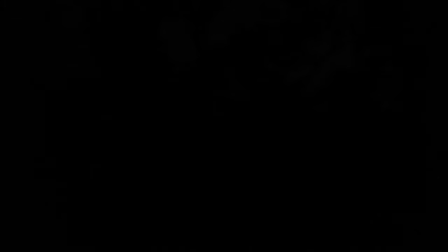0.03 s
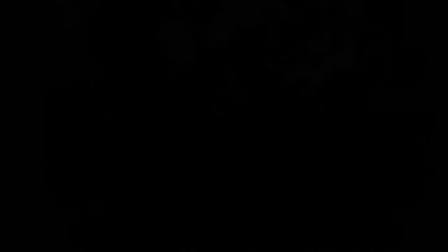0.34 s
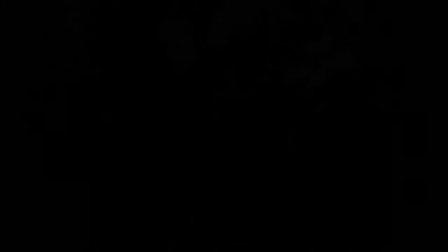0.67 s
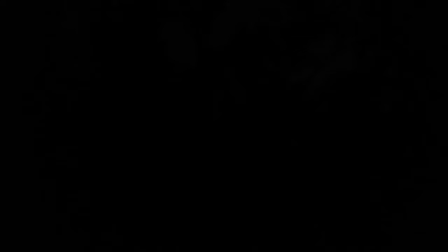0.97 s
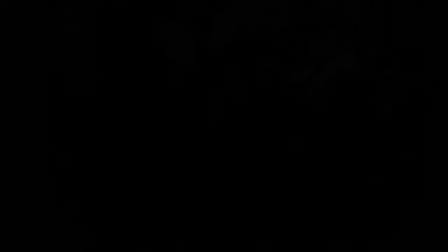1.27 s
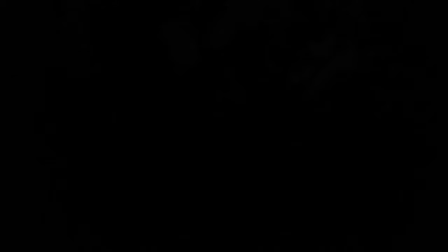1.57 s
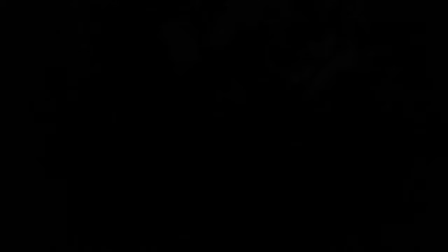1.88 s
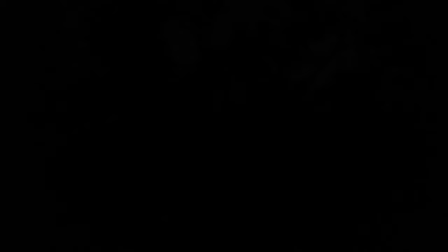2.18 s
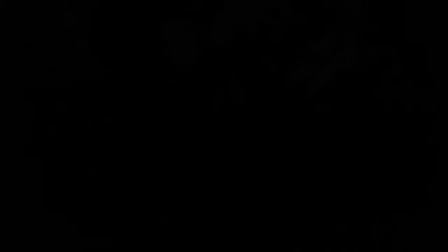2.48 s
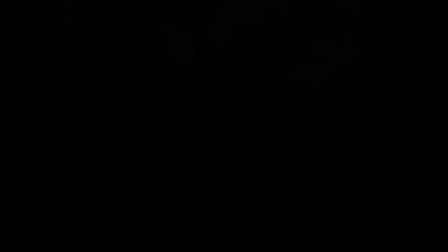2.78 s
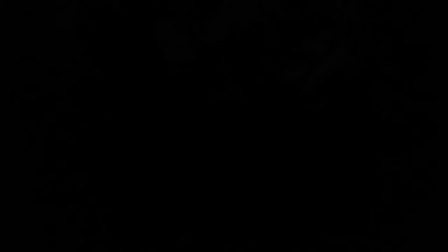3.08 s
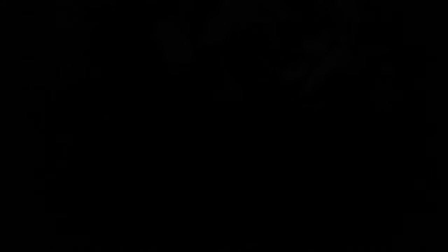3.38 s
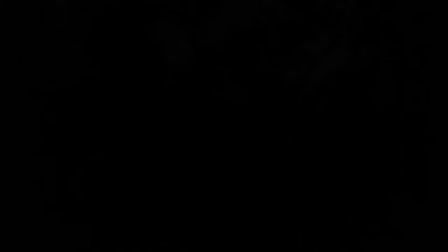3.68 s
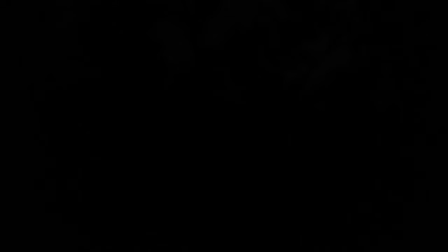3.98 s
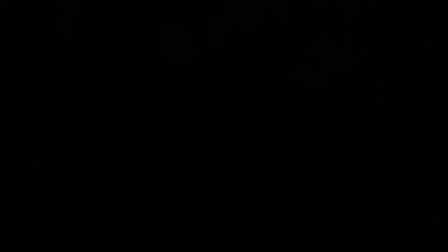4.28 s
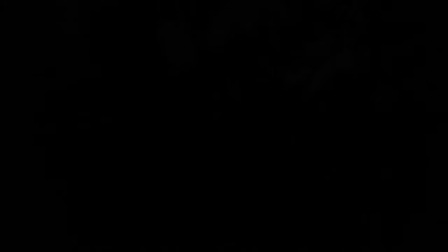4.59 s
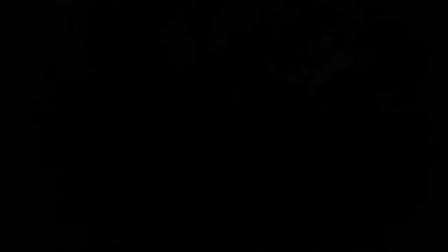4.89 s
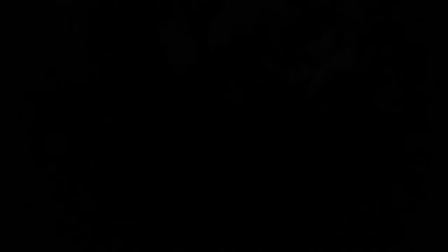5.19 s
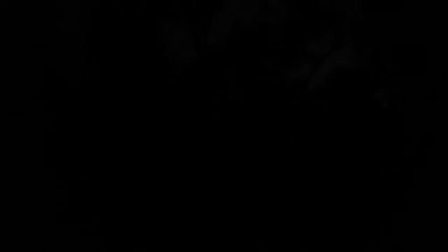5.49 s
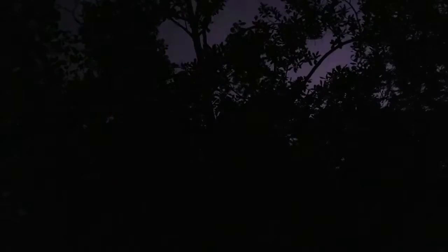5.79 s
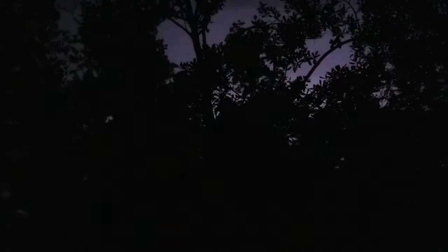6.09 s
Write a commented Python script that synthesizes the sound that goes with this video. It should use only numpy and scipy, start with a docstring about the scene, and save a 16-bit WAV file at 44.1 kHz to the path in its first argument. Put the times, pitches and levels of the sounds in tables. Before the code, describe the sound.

A quiet wooded garden at night, with a soft low rumble, a very faint hum and a thin shimmer of insects throughout. At about 0.3 seconds a distant toad starts a rapid, high trill that grows gradually, then sinks and stops at about 2.7 seconds. At about 1.3 seconds a closer toad joins on nearly the same pitch, slightly to the left. Its trill starts hurried, swells over the next second or so and becomes the loudest sound, an even, ringing purr of very fast pulses. It holds alone, slowing only a little, and stops at about 6.1 seconds. The trees add a light, short echo to both calls. A few faint insect buzzes come in the first 1.5 seconds, and leaves stir and tick very softly now and then behind the toads.

```python
"""A wooded garden at night. Two toads trill: a far one starts, a near one joins and holds its trill.
Each note is two puffs of air that set the vocal sac ringing; ground, trunks and leaves scatter it.
Each call starts hurried, swells as the sac fills and slows as the toad tires.
Behind them are thin bands of insects, a low rumble with a faint hum, and leaves that stir and tick."""
import sys
import numpy as np
from scipy import signal
from scipy.fft import rfft, irfft
from scipy.io import wavfile

SR = 44100
rng = np.random.default_rng(int(sys.argv[2]) if len(sys.argv) > 2 else 0)


def store_wav(level_fs):
    """Save 16-bit WAV to argv[1]."""
    pcm = np.round(np.clip(np.atleast_2d(level_fs), -1, 1) * 32767)
    wavfile.write(sys.argv[1], SR, pcm.T.astype(np.int16))


N = 270774
TIME = np.arange(N) / SR

# Night air and hiss. Each row: frequency in Hz, relative spectral level in dB.
AIR_SPECTRUM = [(25, -13), (45, -2.5), (80, 1), (115, -1), (170, -9), (300, -15.5), (600, -16), (1500, -21),
                (3500, -27), (7500, -27), (10000, -25), (12500, -22), (15500, -22.5)]
# Stereo likeness of the air. Each row: frequency in Hz, left-right correlation.
AIR_CORRELATION = [(30, 1), (125, 0.96), (300, 0.95), (700, 0.64), (2000, 0), (16000, 0)]
# Insect choruses. Each row: centre in Hz, width in Hz, left level in dB, right level in dB.
INSECT_BANDS = [(6236, 366, -62.5, -59.5), (4300, 1940, -65, -63)]
# Insect buzzes and leaf stirs. Each row: middle in seconds, length in seconds, level in dB.
INSECT_BUZZES = [(.15, 0.084, -66), (.385, 0.11, -60.5), (.78, .12, -74), (1.2, 0.19, -59.5),
                 (1.52, 0.15, -62)]
LEAF_STIRS = [(.33, 0.2, -64), (1.194, 0.11, -61), (2.227, .16, -59), (3.25, 0.3, -59.5), (4.03, 0.24, -60),
              (4.233, .12, -56), (4.78, 0.47, -60), (5.26, 0.53, -64), (5.69, 0.38, -56.5)]
# Ticks in the foliage. Each row: start in seconds, relative level in dB.
LEAF_TICKS = [(.088, -48), (0.5314, -38), (0.613, -39), (0.76, -36), (0.998, -36), (1.1365, -27),
              (1.515, -29.5), (2.4104, -38), (3.0994, -41), (3.2435, -36), (3.5887, -37), (3.721, -37),
              (3.8384, -38), (4.6443, -34), (4.9244, -35)]
# Puffs of one note. Each row: delay in seconds, relative level in dB, swell time in seconds,
# starting pitch over trill pitch, fractional pitch fall per second, overtone gain in dB.
FAR_NOTE_PUFFS = [(0, -0.5, 0.002788, 1.053, 13.6, -10), (.0078, -3, 0.0024, 0.9856, 12.7, 0.5)]
NEAR_NOTE_PUFFS = [(0, 0, .00313, 1.066, 19.2, -3), (.00614, -16, .0025, 1.038, 20, 13)]
# Upper sac resonances. Each row: ratio to the pitch, relative level in dB.
SAC_OVERTONES = [(1.988, -26), (2.722, -43.5), (2.948, -47)]
# Body resonances. Each row: centre in Hz, width in Hz, gain in dB.
FAR_BODY_MODES = [(890, 186, 5.5), (1130, 230, 11), (1944, 67, 4), (2070, 184, 11), (2750, 130, 4)]
NEAR_BODY_MODES = [(948, 324, 11.5), (1127.4, 22, 14), (1280, 49, 5), (1495, 32, -6.5), (1742, 20, -6.5),
                   (1985, 16, -1.5), (2190, 30, 23.5), (2282, 53, 20.5), (2713, 43, 18), (2971, 25, 7.5),
                   (3195, 29, 2.5), (3790, 93, 9.5), (4320, 14, 11.5), (4457, 35, 9.5), (4540, 18, 12.5)]
# Ringing of the slack sac. Each row: centre in Hz, width in Hz, gain in dB, fade in dB per second.
SLACK_SAC_RINGS = [(1550, 9.7, -15, 12), (2930, 29, 14, 24)]
# Early echoes. Each row: delay in seconds, gain in dB, channel (0 left, 1 right).
FAR_REFLECTIONS = [(.0033, -12.5, 0), (.0098, -0.5, 0), (0.0135, -2, 0), (.019, -3, 0), (.0044, -7.5, 1),
                   (0.0122, -3, 1), (0.0186, -4, 1)]
NEAR_REFLECTIONS = [(.00615, -3.8, 0), (.01009, -17.5, 0), (.01286, -13, 0), (.01571, -8.9, 0),
                    (.02044, -14.2, 0), (.02493, -9.8, 0), (.02717, -9.2, 0), (.03064, -14.7, 0),
                    (.03392, -13.4, 0), (.05005, -16.1, 0), (.07015, -17.2, 0), (.00164, -3.6, 1),
                    (.00328, -10.7, 1), (.00503, -8.9, 1), (.00669, -5.1, 1), (.01388, -8.8, 1),
                    (.01786, -14.9, 1), (.02178, -15.8, 1), (.04152, -20.8, 1), (.0488, -15.8, 1),
                    (.05834, -20.8, 1), (.0695, -20.5, 1)]


def from_db(db):
    return 10 ** (np.asarray(db) / 20)


def unit_rms(x):
    return x / np.sqrt(np.mean(x ** 2) + 1e-20)


def band(x, low_hz, high_hz, order=2):
    sos = signal.butter(order, [low_hz, min(high_hz, .48 * SR)], "band", fs=SR, output="sos")
    return signal.sosfilt(sos, x)


def band_around(x, centre_hz, width_hz, order=1):
    return band(x, centre_hz - width_hz / 2, centre_hz + width_hz / 2, order)


def delayed(x, delay_s):
    return np.interp(TIME - delay_s, TIME, x, left=0)


def drift(rate_hz):
    """Slow random curve, rms 1."""
    knots = rng.standard_normal(int(TIME[-1] * rate_hz) + 2)
    return unit_rms(np.interp(TIME * rate_hz, np.arange(len(knots)), knots))


def swells(rows):
    """Gain curve with one Gaussian bump per row."""
    return sum(from_db(db) * np.exp(-(2 * (TIME - middle_s) / length_s) ** 2)
               for middle_s, length_s, db in rows)


def over_bins(points):
    """Interpolate a table onto the FFT bins in log frequency."""
    hz, values = np.array(points).T
    bin_hz = np.maximum(np.arange(N // 2 + 1) * SR / N, 1)
    return np.interp(np.log(bin_hz), np.log(hz), values)


def night_air(level_db):
    """Distant rumble, alike in both ears, under a faint wavering hiss."""
    correlation = over_bins(AIR_CORRELATION)
    mid, side = rfft(rng.standard_normal((2, N)))
    spectrum = np.sqrt(1 + correlation) * mid + np.sqrt(1 - correlation) * side * [[1], [-1]]
    air = irfft(from_db(over_bins(AIR_SPECTRUM)) * spectrum, N)
    rumble = signal.sosfiltfilt(signal.butter(2, 5000, fs=SR, output="sos"), air)
    hiss = (air - rumble) * from_db(0.22 * drift(6.5))
    return from_db(level_db) * unit_rms(band(rumble, 16, 18000) + hiss)


def wavering_tone(hz, level_db, wander_rad, wander_hz):
    """Sine with a wandering phase."""
    phase = 2 * np.pi * hz * TIME + wander_rad * drift(wander_hz)
    return from_db(level_db) * np.sqrt(2) * np.sin(phase)


def insects():
    """Many far insects merge into shimmering bands; one buzzes in short bursts."""
    chorus = np.zeros((2, N))
    for hz, width_hz, left_db, right_db in INSECT_BANDS:
        gain = from_db([[left_db], [right_db]]) * from_db(0.57 * drift(40))
        chorus += gain * unit_rms(band_around(rng.standard_normal((2, N)), hz, width_hz, order=2))
    buzz = unit_rms(band(rng.standard_normal((2, N)), 4230, 4760))
    return chorus + swells(INSECT_BUZZES) * buzz


def leaf_rustle(grains_per_s, rest_db, flicker_db):
    """Fine crackle of leaves, rising with each stir."""
    grains = (rng.random((2, N)) < grains_per_s / SR) * rng.standard_normal((2, N))
    grains *= from_db(flicker_db * drift(40))
    crackle = unit_rms(band(grains + 1e-18, 4600, 23000, order=1))
    return (from_db(rest_db) + swells(LEAF_STIRS)) * crackle


def leaf_ticks(t60_s, gain_db):
    """Tiny bright cracks that die at once."""
    cracks = np.zeros((2, N))
    age_s = np.arange(SR // 20) / SR
    for start_s, db in LEAF_TICKS:
        at = int(start_s * SR)
        envelope = from_db(db + gain_db - 60 * age_s / t60_s)
        cracks[:, at:at + len(age_s)] += envelope * rng.standard_normal((2, len(age_s)))
    return band(cracks + 1e-18, 3400, 22000, order=1)


def note_times(start_s, stop_s, rate_hz, slowing_hz_per_s, hurry_hz, settle_s, tired_s=0, tired_hz=0):
    """The beat starts hurried, slows steadily and drops by tired_hz once the toad tires."""
    age_s = np.maximum(TIME - start_s, 0)
    beat_hz = rate_hz - slowing_hz_per_s * age_s + hurry_hz * np.exp(-age_s / settle_s)
    beat_hz -= tired_hz * (TIME > tired_s)
    count = np.cumsum(beat_hz * (TIME > start_s) * (TIME < stop_s)) / SR
    return np.searchsorted(count, np.arange(1, count[-1])) / SR


def sac_filling(notes_s, held_hz, scoop_hz, slack_hz, sag_hz_per_s,
                held_db, slack_db, attack_db, attack_s, fill_s):
    """Note pitch and level: both rise at the attack and as the sac fills; the pitch then sags."""
    age_s = notes_s - notes_s[0]
    closed, slack = np.exp(-age_s / attack_s), np.exp(-age_s / fill_s)
    pitch_hz = held_hz - scoop_hz * closed - slack_hz * slack - sag_hz_per_s * age_s
    return pitch_hz, held_db - slack_db * slack - attack_db * closed


def puff(age_s, pitch_hz, swell_s, fall_per_s, overtone_db, snap_db, snap_s, rasp_db):
    """The larynx snaps open; the sac swells and rings down as its pitch sags."""
    age_s = np.maximum(age_s, 0)
    envelope = (age_s / swell_s * np.exp(1 - age_s / swell_s)) ** 3
    phase = 2 * np.pi * pitch_hz * (age_s - fall_per_s * age_s ** 2 / 2)
    snap = from_db(snap_db) * age_s / snap_s * np.exp(1 - age_s / snap_s)
    overtones = sum(from_db(db + overtone_db) * np.sin(ratio * phase) for ratio, db in SAC_OVERTONES)
    breath = unit_rms(band(rng.standard_normal(age_s.shape), 660, 2620))
    rasp = from_db(rasp_db + overtone_db / 2) * breath
    # Overtones and rasp sound while the sac is driven hardest.
    return (envelope + snap) * np.sin(phase) + envelope ** 2 * (overtones + rasp)


def trill(notes_s, pitch_hz, level_db, puffs, jitter_s, spread, shimmer_db, stretch=1, **timbre):
    """A run of puffed notes, each varying slightly in timing, pitch and strength."""
    pitch_draw, time_draw, gap_draw = rng.standard_normal((3, len(notes_s), 1))
    note_hz = pitch_hz[:, None] * (1 + spread * pitch_draw)
    age_s = np.arange(SR // 28) / SR
    notes = np.zeros((len(notes_s), len(age_s)))
    for delay_s, db, swell_s, ratio, fall_per_s, overtone_db in puffs:
        gain = from_db(db + shimmer_db * rng.standard_normal((len(notes_s), 1)))
        puff_age_s = age_s - delay_s * (1 + spread * gap_draw)
        notes += gain * puff(puff_age_s, note_hz * ratio, swell_s * stretch, fall_per_s / stretch,
                             overtone_db, **timbre)
    power = np.mean(np.sum(notes ** 2, axis=1)) / np.mean(np.diff(notes_s)) / SR
    notes *= from_db(level_db)[:, None] / np.sqrt(power)
    first_swell_s = puffs[0][2]
    onsets_s = notes_s[:, None] - first_swell_s + jitter_s * time_draw
    samples = (onsets_s * SR).astype(int) + np.arange(len(age_s))
    return np.bincount(samples.ravel(), notes.ravel(), N)[:N]


def body(voice, modes, low_hz):
    """The toad's body radiates no bass and adds resonances."""
    voice = band(voice, low_hz, 6000, order=3)
    return voice + sum(from_db(db) * band_around(voice, hz, width_hz) for hz, width_hz, db in modes)


def garden(voice, echoes, right_lag_s, left_bias_db, scatter_db, diffuse_db, t60_s, leaf_db):
    """Direct sound, early echoes and a tail scattered by foliage."""
    early = np.array([voice, voice])
    for delay_s, db, channel in echoes:
        early[int(channel)] += from_db(db) * delayed(voice, delay_s)
    early *= from_db([[left_bias_db / 2], [-left_bias_db / 2]])
    age_s = np.arange(SR // 2) / SR
    envelope = from_db(-60 * age_s / t60_s) * (1 - np.exp(-age_s / 0.066))
    tails = envelope * rng.standard_normal((3, len(age_s)))
    tails /= np.sqrt(np.sum(tails ** 2, axis=1, keepdims=True))
    # Leaves scatter short waves more than long ones.
    bright = voice + from_db(leaf_db) * band(voice, 3370, 9400, order=3)
    scattered = signal.fftconvolve(bright[None], tails, axes=1)[:, :N]
    left, right = early + from_db(scatter_db) * scattered[0]
    return np.array([left, delayed(right, right_lag_s)]) + from_db(diffuse_db) * scattered[1:]


def far_toad():
    """Soft puffs smoothed by echoes, over a thin, wavering low tone near 980 Hz that follows the call."""
    notes_s = note_times(0.305, 2.65, rate_hz=40.2, slowing_hz_per_s=2.2, hurry_hz=4.5, settle_s=0.15)
    pitch_hz, level_db = sac_filling(
        notes_s, held_hz=1616, scoop_hz=197, slack_hz=17, sag_hz_per_s=16,
        held_db=-32, slack_db=7.5, attack_db=22, attack_s=0.067, fill_s=0.77)
    # Out of air: the last notes sink and fade.
    spent_s = np.maximum(notes_s - 2.43, 0)
    pitch_hz -= 410 * spent_s
    level_db -= 30 * spent_s
    voice = trill(notes_s, pitch_hz, level_db, FAR_NOTE_PUFFS, jitter_s=0.00007, spread=0.0043,
                  shimmer_db=0.53, snap_db=-12, snap_s=0.001, rasp_db=-22.5)
    voice = body(voice, FAR_BODY_MODES, low_hz=600)
    tone_db = np.interp(TIME, notes_s, level_db, left=-120, right=-120) - 21.5 + 2.0 * drift(18)
    low_tone = wavering_tone(hz=978, level_db=tone_db, wander_rad=2.2, wander_hz=21.65)
    heard = garden(voice, FAR_REFLECTIONS, right_lag_s=0.00031, left_bias_db=-1.5,
                   scatter_db=4, diffuse_db=-0.5, t60_s=0.2, leaf_db=-12)
    return from_db(-7.5) * heard + np.array([low_tone, delayed(low_tone, 0.00012)])


def near_toad():
    """Rounded, falling puffs, drawn out and ringing until the sac tightens; overtones beam left."""
    notes_s = note_times(1.2644, 6.14, rate_hz=37.89, slowing_hz_per_s=0.545, hurry_hz=5.46,
                         settle_s=0.4, tired_s=5.36, tired_hz=0.83)
    notes_s += 0.0005 * np.interp(notes_s, TIME, drift(6))
    pitch_hz, level_db = sac_filling(
        notes_s, held_hz=1636, scoop_hz=90, slack_hz=105, sag_hz_per_s=7.6,
        held_db=-21.2, slack_db=11, attack_db=9, attack_s=0.04, fill_s=0.55)
    slack_stretch, tighten_s = 0.67, 0.14
    stretch = 1 + slack_stretch * np.exp(-(notes_s - notes_s[0]) / tighten_s)
    voice = trill(notes_s, pitch_hz, level_db, NEAR_NOTE_PUFFS, jitter_s=0.00005, spread=0.0067,
                  shimmer_db=0.5, stretch=stretch[:, None], snap_db=-28, snap_s=0.00014, rasp_db=-34)
    voice = body(voice, NEAR_BODY_MODES, low_hz=720)
    age_s = np.maximum(TIME - notes_s[0], 0)
    rings = sum(from_db(db - fade_db_per_s * age_s) * band_around(voice, hz, width_hz)
                for hz, width_hz, db, fade_db_per_s in SLACK_SAC_RINGS)
    heard = garden(voice + rings, NEAR_REFLECTIONS, right_lag_s=0.0003, left_bias_db=-3,
                   scatter_db=-4, diffuse_db=-10, t60_s=1.0, leaf_db=4.5)
    beam = (from_db([[1.5], [-6.5]]) - 1) * band(heard, 2370, 4900)
    return from_db(-5.5) * (heard + beam)


def rumble_swell(middle_s, length_s, level_db):
    """The upper part of the distant rumble swells once."""
    rumble = unit_rms(band(rng.standard_normal(N), 137, 316))
    return swells([(middle_s, length_s, level_db)]) * rumble


def scene():
    """Both toads over the night background."""
    air = night_air(level_db=-53.5)
    hum = wavering_tone(hz=117.4, level_db=-64, wander_rad=0.65, wander_hz=3.2)
    chorus = insects()
    rustle = leaf_rustle(grains_per_s=1500, rest_db=-74, flicker_db=1.5)
    ticks = leaf_ticks(t60_s=0.033, gain_db=-10)
    toads = far_toad() + near_toad()
    swell = rumble_swell(middle_s=4.04, length_s=1.0, level_db=-62.5)
    return air + hum + chorus + rustle + ticks + toads + swell


def record(dry):
    """Steep low-pass at 15950 Hz."""
    return signal.sosfilt(signal.ellip(12, .1, 90, 15950, fs=SR, output="sos"), dry)


dry = scene()
out = record(dry)
store_wav(out)
```